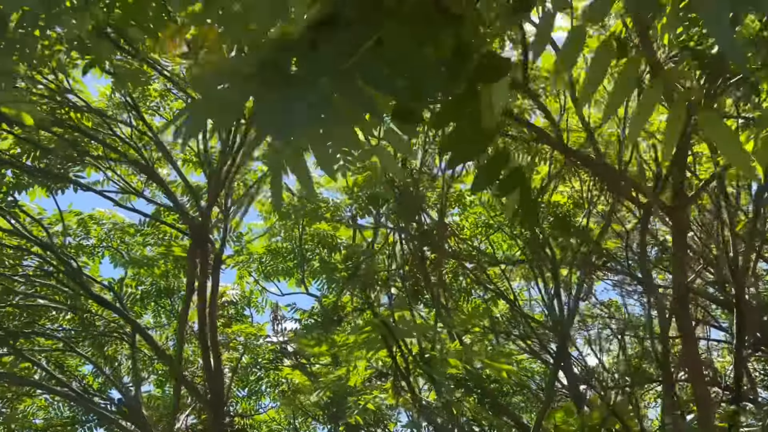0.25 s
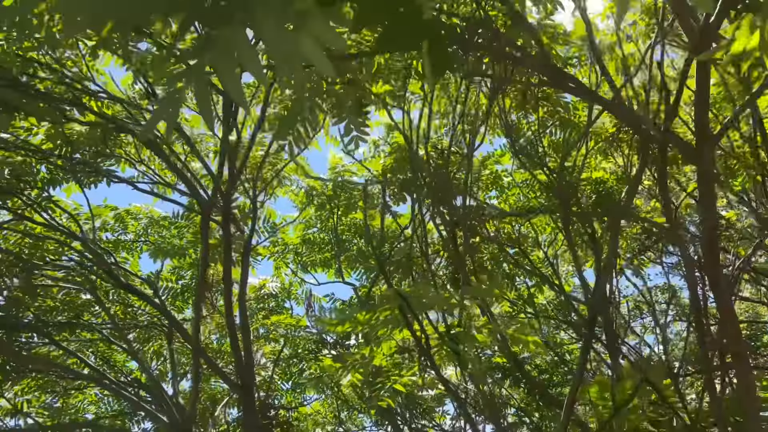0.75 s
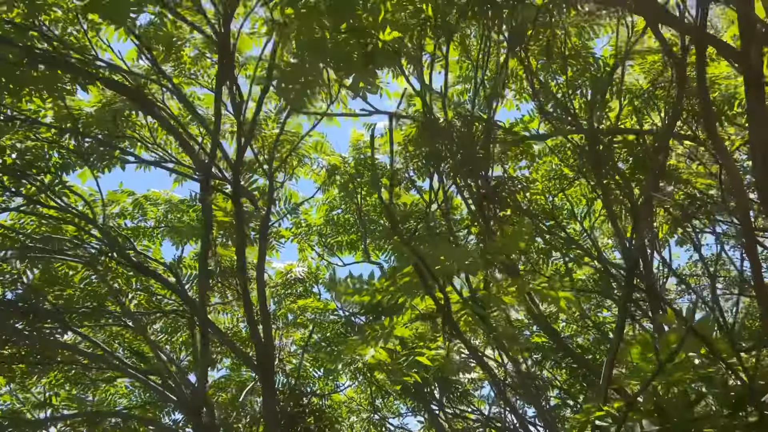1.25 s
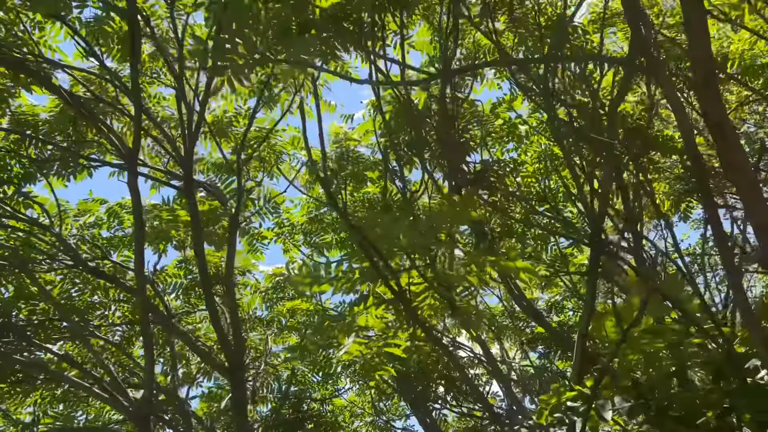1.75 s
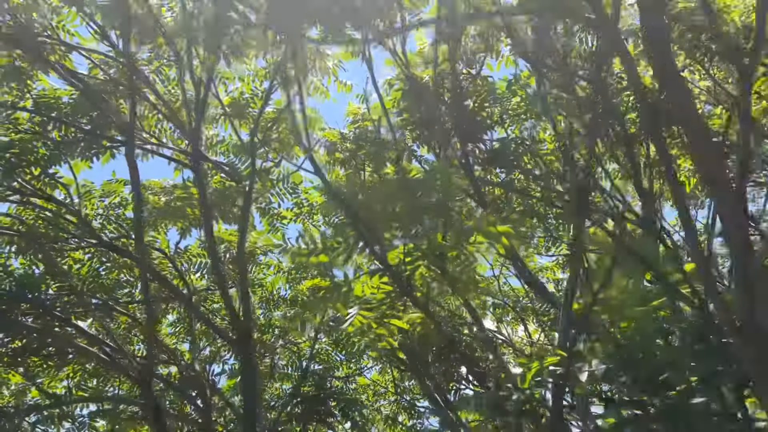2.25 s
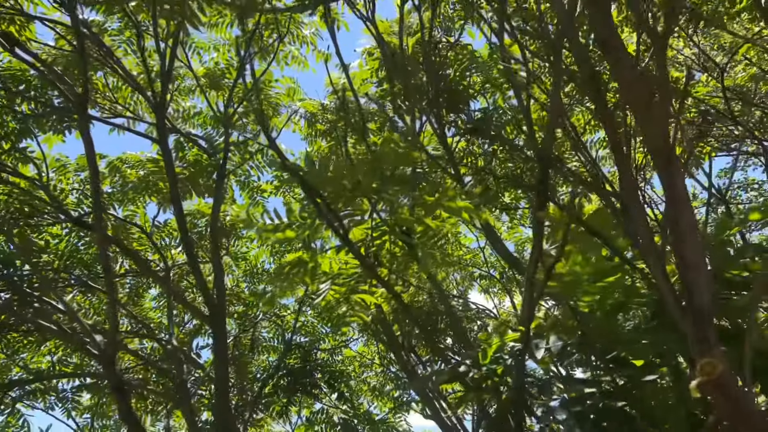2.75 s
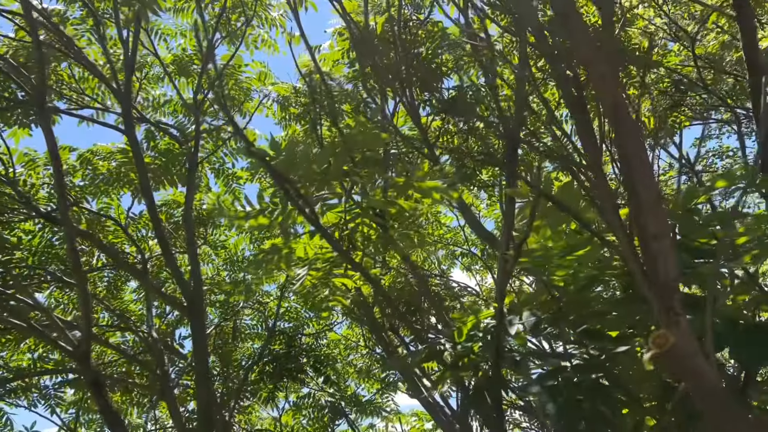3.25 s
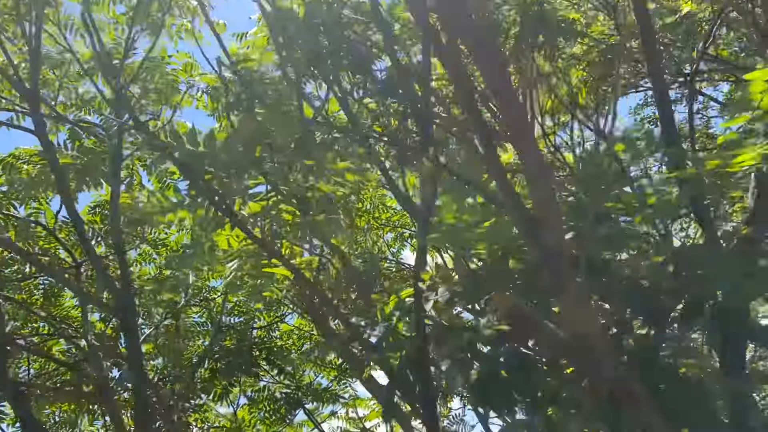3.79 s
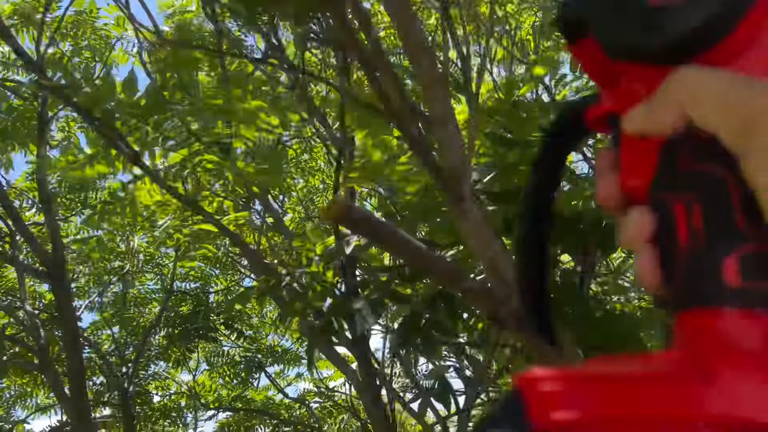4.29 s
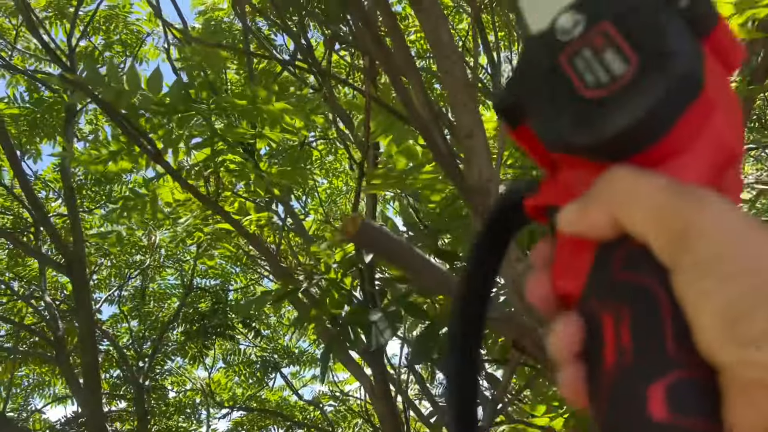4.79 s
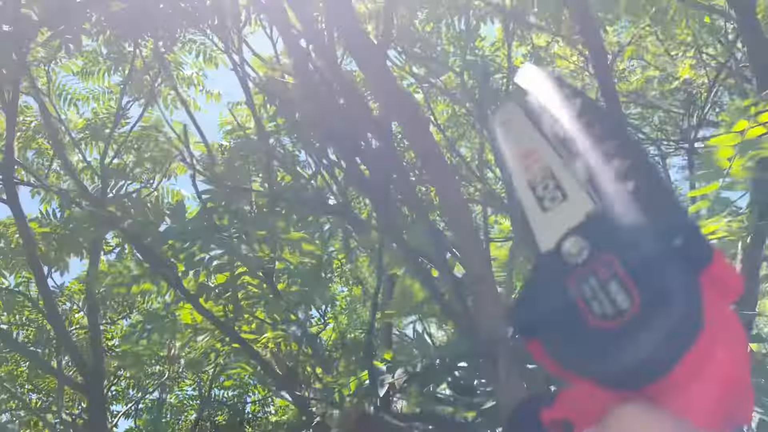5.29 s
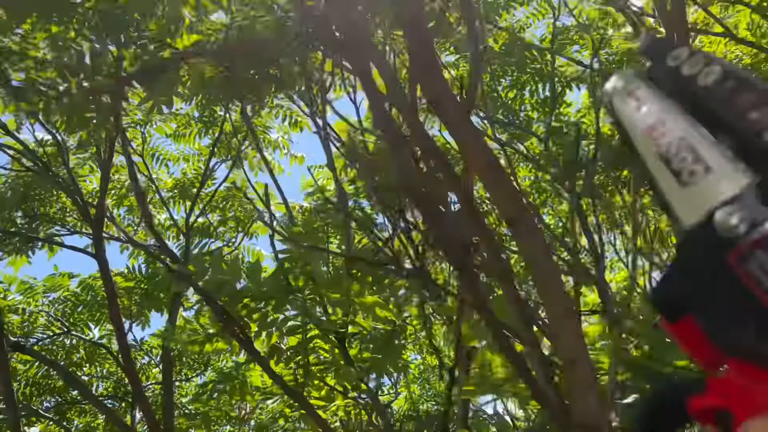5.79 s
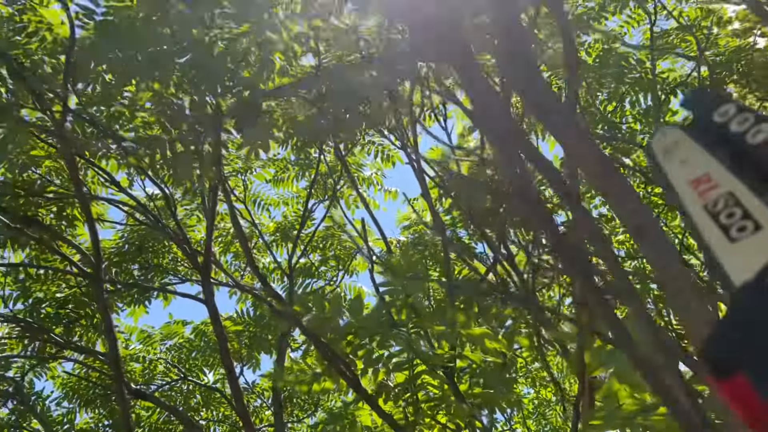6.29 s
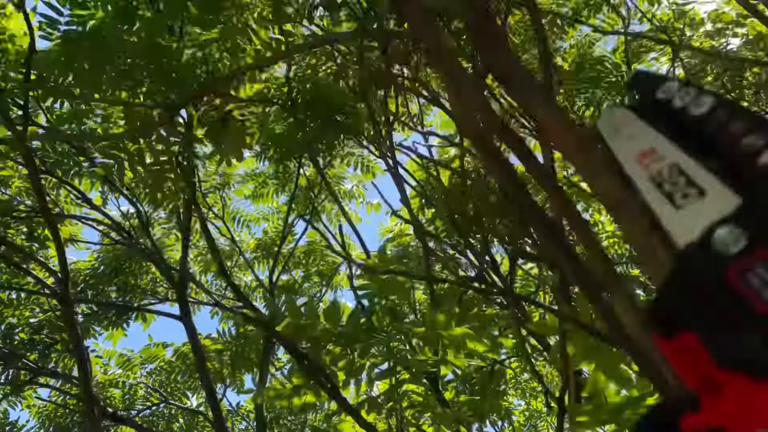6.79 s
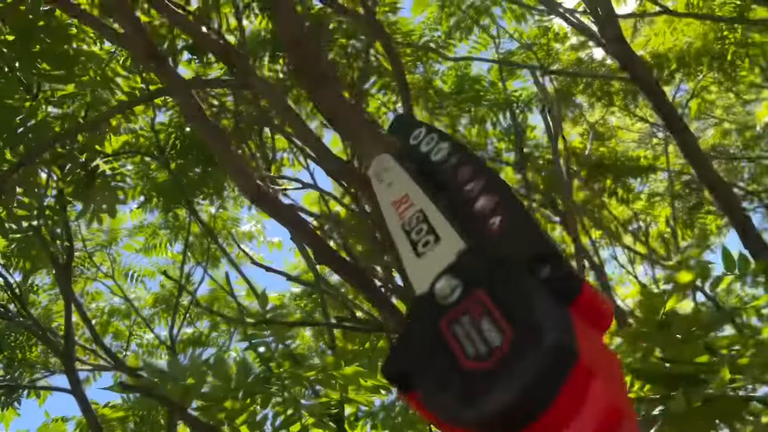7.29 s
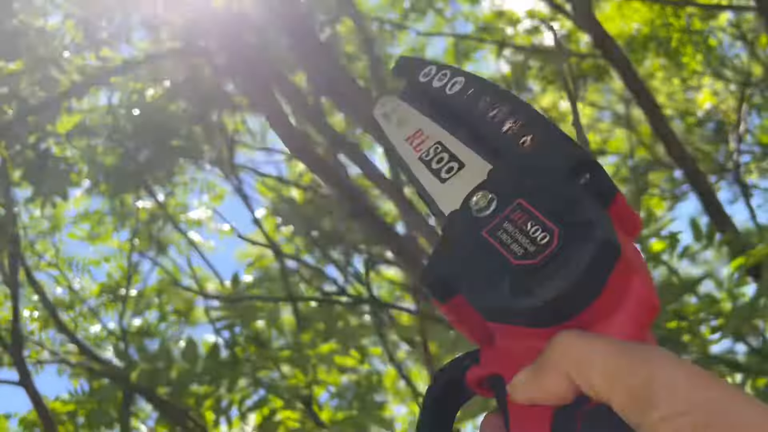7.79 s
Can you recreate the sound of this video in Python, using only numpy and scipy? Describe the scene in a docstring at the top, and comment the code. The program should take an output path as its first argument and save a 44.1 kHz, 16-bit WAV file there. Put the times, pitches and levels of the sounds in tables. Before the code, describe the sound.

Under trees outdoors, a low uneven engine idle and bassy air lie beneath near chirps on the left and fast insect trills. Leaves rustle faintly and small parts click. After a sharper click a little battery chainsaw jumps to full speed, close to a stereo microphone, and runs unloaded with a rattling, hissing whine. Its brightness shifts as it is swung around, while the background sinks away almost completely.

```python
"""An engine idles in airy ambience while insects chirp and trill, leaves rustle and small parts click.
Then a small battery chainsaw starts under trees and runs unloaded, swung past a pair of microphones,
while the background sinks. Engine and whine are sums of sines locked to turning rates, insects are
gated tones, air and leaves are filtered noise, and the saw adds link knocks and throbbing noise bands."""
import sys
import numpy as np
from scipy import signal
from scipy.fft import rfft, irfft, next_fast_len
from scipy.io import wavfile
from scipy.ndimage import map_coordinates

SR = 44100
rng = np.random.default_rng(int(sys.argv[2]) if len(sys.argv) > 2 else 0)


def wav_out(sig):
    """Save sig, one row per channel (or a flat mono array), as 16-bit PCM at SR to the path in sys.argv[1]."""
    wavfile.write(sys.argv[1], SR, np.round(np.clip(np.atleast_2d(sig).T, -1, 1) * 32767).astype(np.int16))


N = 354651
TIME = np.arange(N) / SR
HZ = np.fft.rfftfreq(next_fast_len(N), 1 / SR) + 1e-3  # kept off zero for logs and divisions

# fader of the whole background: (time [s], level [dB])
BACKGROUND_FADER = [(0, -0.5), (2.35, 2), (2.41, -4), (2.5, -11.5), (2.8, -10), (3.5, -18.5), (5, -23),
                    (8.04, -24.5)]

# idling engine: levels of orders 9 to 18 of the cycle [dB]
IDLE_ORDER_DB = [-49, -65, -38.5, -34, -34.5, -45.5, -62, -34.5, -48, -43]
CYCLE_HZ, FIRING_S = 4.797, 0.205  # cycle rate, moment of the strongest firing
# low hum beside the idle, changing in level: (time [s], level [dB])
HUM_LEVEL = [(0, -51), (.7, -53), (1.0, -40.5), (2.4, -46), (8.04, -37.5)]
HUM_HZ = 109.3

# colour of the air: (frequency [Hz], relative level [dB])
AIR_COLOUR = [(33, -42), (48, -9.5), (75, -12), (130, -29), (300, -37.5), (1000, -47), (2800, -57.5),
              (7000, -62), (10000, -71), (12500, -61.5), (15500, -45)]
# left-right likeness of the air: (frequency [Hz], likeness [0-1])
AIR_LIKENESS = [(60, 0.98), (130, 0.81), (290, 0.46), (640, 0)]
AIR_DB = -35

# near insect, bursts of even chirps: (first chirp [s], last chirp [s], level [dB])
NEAR_CHIRPS = [(0.014, 0.013, -38.5), (.1735, .2394, -44.5), (.5262, .5934, -43.5), (.7527, .8215, -49),
               (.9872, 1.057, -43.5), (1.231, 1.3002, -47), (1.6237, 1.656, -48), (1.8068, 1.8427, -47),
               (2.105, 2.165, -50), (2.301, 2.335, -52)]
CHIRP_GAP_S, CHIRP_S, NEAR_SAG_HZ = 0.033, 0.018, 800  # usual gap, length, pitch sag at the end
# far insects, trilled phrases: (start [s], end [s], level before the fade [dB])
FAR_PHRASES = [(0.056, 0.328, -47.5), (0.372, 0.658, -46.5), (0.672, 0.935, -48.5), (0.948, 1.155, -46),
               (1.202, 1.44, -45), (1.531, 1.77, -48), (1.77, 2.064, -48.5), (2.07, 2.245, -45.5),
               (2.285, 2.5, -44)]
STROKES_PER_S, FAR_SAG_HZ = 89, 450
PHRASE_RISE_S, PHRASE_FADE_DB = 0.039, -8.5  # ramp at both ends, fade over the phrase

# rustling leaves: (time [s], length [s], level [dB], centre [Hz])
LEAF_RUSTLES = [(0.161, 0.057, -51, 1100), (0.34, 0.032, -54, 1500), (0.462, 0.068, -55, 1290),
                (0.838, .04, -56, 1092), (1.029, 0.16, -52, 1440), (1.815, 0.33, -52, 6760)]

# clicks of twigs, safety catch and trigger: (time [s], level [dB], ring [Hz], ring length [ms],
# crack against the ring [dB], crack centre [Hz], left over right [dB])
CLICKS = [(1.197, -32.5, 855, 1.1, -9, 2400, 2), (1.78, -31, 2100, 5.8, -2, 6380, 6),
          (2.3588, -27, 2200, 3.9, -3, 4000, -5)]

# bearing of the saw: (time [s], lag of the left side [ms])
SAW_BEARING = [(2.42, .398), (3.2, .396), (3.4, .351), (3.6, .283), (3.8, .21), (3.94, .14), (4.03, .045),
               (4.7, .008), (5.4, .012), (5.85, .045), (6.1, .1), (6.25, .125), (6.45, .135), (6.6, .1),
               (7.1, .01), (7.4, -.04), (7.65, -.04), (7.95, -.007)]
# saw swung nearer and farther: (time [s], level [dB])
SAW_NEARNESS = [(2.4, -0.3), (3.0, -2), (3.3, 1), (3.7, 1.1), (4.0, -.5), (4.25, 0), (4.6, -0.5),
                (5.1, 1.06), (5.9, -1), (6.5, 1.3), (7.0, 0.15), (7.9, 1)]
# chain takes up its slack, then bites the sprocket: (time [s], gain [0-1])
START_GAIN = [(2.359, 0), (2.363, .22), (2.373, .35), (2.376, 1)]
START_S, SURGE_S = 2.36, 0.21  # start of the saw, time constant of the starting surge
# spin-up, then settling: (shortfall at the start [links/s], time constant [s])
SPEED_SHORTFALLS = [(86, .07), (5.5, 1.8)]
FULL_SPEED = 449.2  # drive links per s
# slackened trigger: moment, speed lost per s [links/s], level dip, recovery time constant of the dip
SLACK_S, SLACK_SAG, SLACK_DB, SLACK_RECOVER_S = 7.925, 70, -5.5, 0.053
# housing turns away from the microphones: start and end [s]
HOUSING_TURN = (3.22, 3.32)
# left lag at which the saw counts as three quarters side-on, for colour and for balance
SIDE_ON_MS, PAN_MS = 0.068, 0.049

# colours of the five parts of the saw: (frequency [Hz], relative level [dB])
GEARBOX_COLOUR = [(250, -19), (340, -21.5), (430, -5), (660, -3.5), (780, 2), (960, -7), (1150, -2.5),
                  (1370, 2.5), (1600, -6.5), (1800, -13.5), (2400, -25)]
BAR_COLOUR = [(1300, -48), (1650, -5), (1950, 1.5), (2250, -1), (2600, -0.5), (3000, -6.5), (3800, -14)]
LINKS_COLOUR = [(2400, -28), (3000, -5), (3500, 0), (4100, -1), (5200, -1.5), (5800, -22), (7000, -59)]
RAIL_COLOUR = [(4600, -33), (5500, -3.5), (6400, 1), (7000, -1), (7800, 1.5), (9000, 1.5), (10500, -10.5)]
FAN_COLOUR = [(7800, -18.5), (9200, -2), (10200, -8), (11500, 7), (13500, 0), (15500, 8), (17000, -4)]
# per part, in the order above: (level straight ahead [dB], added side-on [dB],
# added while the housing faces the microphones [dB], starting surge [dB])
PART_LEVELS = [(-30, 0.5, -1, 2), (-29, 0.5, 2.5, 4.5), (-33.5, 1, 5.5, 6.5), (-31.5, 5, -0.5, 4.5),
               (-23.5, 0, 0, -8)]
# per part: (left over right following the bearing [dB], the same added whenever off centre [dB])
PART_LEANS = [(-1.5, -1.5), (-3, 1), (-2, 2), (0.5, 5), (3, 0)]
# per part, throb depth: (link [0-1], sprocket turn [0-1], motor turn [0-1], uneven links of the lap [0-1])
PART_THROB = [(.08, .07, .11, .1), (.18, .25, .15, .17), (.07, .02, .03, .07), (.07, .042, .04, .09),
              (.09, .06, .04, .06)]
# per part, power shares: (repeating knocks [0-1], scattered by leaves straight ahead [0-1], side-on [0-1])
PART_TEXTURE = [(0.39, 0.02, 0.092), (0.37, 0.023, 0.045), (0.12, 0.015, 0.47), (0.022, 0.96, 1),
                (0.018, .01, .01)]
SCREENED = 0.24  # share of the side-on change in scattering that the facing housing screens off

# clean whine: multiples of the link rate; sevenths are sprocket turns, fifths add the motor turn
WHINE_MULTIPLES = [1, 9 / 7, 2, 15 / 7, 20 / 7, 3, 3.2, 4.2, 5, 5.2]
# whine orders under 5: level before wander [dB]
WHINE_LEVELS = [-42, -53, -51.5, -54, -47, -33.5, -42.5, -46]
# orders 5 and 5.2: (level turned away [dB], added while facing [dB], starting surge [dB])
FIFTH_LEVELS = [(-40.5, 8.5, 10.5), (-54, 14, 8)]
WHINE_WANDER_DB, WHINE_WANDER = 1.5, 0.3  # wander in level, in phase [radians]
SPIN_UP_WANDER, SPIN_UP_WANDER_S = 2.0, 0.15  # extra phase wander [radians], its time constant

# hollow of the housing: (centre [Hz], width [Hz])
HOLLOW_BAND = (2130, 110)
# its level: (turned away [dB], added while facing [dB], starting surge [dB])
HOLLOW_LEVEL = (-45, 14, 3.5)
# singing rail: (centre [Hz], width [Hz])
RAIL_WHISTLE = (6450, 550)
RAIL_WHISTLE_DB = -36
# gliding bright band: (time [s], centre [Hz], level [dB], left over right [dB])
BRIGHT_SWEEP = [(3.05, 8600, -33, -9), (3.2, 8000, -27, -3), (3.35, 6200, -28, 2), (3.5, 5350, -22.5, 7.5),
                (3.75, 5620, -30.5, -2), (3.95, 5700, -35, 0), (4.05, 5800, -50, 0)]
SWEEP_WIDTH_HZ = 3200

# colour change while the housing faces the microphones: (frequency [Hz], level [dB])
FACING_TINT = [(400, 0), (900, 4), (1100, 4.5), (1350, -1), (1650, 0.5), (3600, -0.5), (4050, -7.5),
               (4500, 0), (9700, 2.5), (14000, -4)]
# colour change at a slant, reversed on the other side: (frequency [Hz], level [dB])
SLANT_TINT = [(1400, 0.5), (1900, 4.5), (2600, -2), (3300, -3.5), (4300, -0.5), (6300, 1)]
SLANT_MS = 0.16  # left lag where the slant colour is strongest
# left lag added below and above the pitch that parts them
LOWER_LAG_MS, UPPER_LAG_MS, PARTING_HZ = 0.018, -0.02, 2500
BASS_SHADE_DB_PER_MS = -10  # bass lost on the left per ms of lag

# treble crossover, lag of the left treble, frequency where both sides are in step, top edge
TREBLE_HZ, TREBLE_LAG_MS, IN_STEP_HZ, CUTOFF_HZ = 7750, 0.25, 12166, 15800


def amp(db):
    """Turns decibels into gain."""
    return 10 ** (np.asarray(db) / 20)


def rms_one(x):
    """Scales the whole array to rms 1."""
    return x / np.sqrt(np.mean(x ** 2) + 1e-20)


def in_time(rows):
    """Draws straight lines through every column of a time table."""
    times, *columns = np.transpose(rows)
    return np.array([np.interp(TIME, times, column) for column in columns])


def at_hz(points):
    """Reads a frequency table along a log frequency axis."""
    hz, values = np.transpose(points)
    return np.interp(np.log(HZ), np.log(hz), values)


def shaped(x, gain):
    """Weights every frequency by gain."""
    size = next_fast_len(N)
    return irfft(rfft(x, size) * gain, size)[..., :N]


def drift(rate_hz):
    """Slow random wander of rms 1."""
    return rms_one(shaped(rng.standard_normal(N), 1 / (1 + (HZ / rate_hz) ** 2)))


def pan(db):
    """Left and right gains, the left louder by db."""
    return amp(np.array([db / 2, -db / 2]))


def later(x, lag_ms):
    """Delays by a lag that may glide."""
    return map_coordinates(x, [np.arange(N) - lag_ms * SR / 1000], order=3)


def resonance(x, hz, width_hz):
    """Two-pole ringing band."""
    radius = np.exp(-np.pi * width_hz / SR)
    poles = [1, -2 * radius * np.cos(2 * np.pi * hz / SR), radius ** 2]
    return signal.lfilter([1, 0, -1], poles, x + 1e-18)


def narrow_noise(band):
    """Noise rung twice through one resonance, at rms 1."""
    return rms_one(resonance(resonance(rng.standard_normal(N), *band), *band))


def engine():
    """Uneven firings repeat each cycle: orders line up once a cycle and throb; a low hum runs beside."""
    cycle = 2 * np.pi * CYCLE_HZ * (TIME - FIRING_S)
    idle = 0
    for order, db in enumerate(IDLE_ORDER_DB, start=9):
        level = amp(db + 3.5 * drift(1.0))
        idle = idle + level * np.sin(order * cycle + 1.05 * drift(3.3))
    hum_level = amp(in_time(HUM_LEVEL)[0] + 2.9 * drift(1.8))
    hum = hum_level * np.sin(2 * np.pi * HUM_HZ * TIME)
    return np.sqrt(2) * (idle + hum) * pan(1.1)[:, None]


def air():
    """Far traffic and foliage as mid-side noise, alike on both sides only in the bass."""
    alike = np.clip(at_hz(AIR_LIKENESS), 0, 1)
    colour = amp(at_hz(AIR_COLOUR))
    mid, side = rng.standard_normal((2, N))
    mid = shaped(mid, colour * np.sqrt(1 + alike))
    side = shaped(side, colour * np.sqrt(1 - alike))
    return amp(AIR_DB) * rms_one(np.array([mid + side, mid - side]))


def chirp(length_s, off_hz, sag_hz, phase):
    """A few wing strokes that hold their pitch, then sag at the end."""
    age = np.arange(round(length_s * SR)) / SR
    pitch_hz = 5650 + off_hz - sag_hz * (age / length_s) ** 4
    strokes = 0.75 - 0.22 * np.cos(2 * np.pi * 170 * age + phase)
    envelope = np.sin(np.pi * age / length_s) ** 0.61
    return envelope * strokes * np.sin(2 * np.pi * np.cumsum(pitch_hz) / SR)


def near_insect():
    """One insect close by on the left repeats evenly spaced chirps."""
    out = np.zeros((2, N))
    for first, last, db in NEAR_CHIRPS:
        count = round((last - first) / CHIRP_GAP_S) + 1
        for middle in np.linspace(first, last, count):
            detune, phase, loudness = rng.standard_normal(3)
            one = amp(db + loudness) * chirp(CHIRP_S, 20 * detune, NEAR_SAG_HZ, phase)
            at = round(max(middle - CHIRP_S / 2, 0) * SR)
            out[:, at:at + len(one)] += one * pan(9.7)[:, None]
    return out


def far_insects():
    """Rapid strokes swell and fade in phrases, unlike on the two sides, over a soft blurred band."""
    out = np.zeros((2, N))
    for start, end, db in FAR_PHRASES:
        for s in np.arange(start, end, 1 / STROKES_PER_S):
            ramp = min(1, (s - start) / PHRASE_RISE_S, (end - s) / PHRASE_RISE_S)
            swell = ramp * amp(db + PHRASE_FADE_DB * (s - start) / (end - start))
            for side in range(2):
                detune, phase, loudness, timing = rng.standard_normal(4)
                gain = swell * amp(1.5 * loudness) * pan(8.5)[side]
                one = gain * chirp(0.0205, -130 * abs(detune), FAR_SAG_HZ, phase)
                at = round((s + 0.0026 * timing) * SR)
                out[side, at:at + len(one)] += one
    blur = rms_one(resonance(resonance(rng.standard_normal((2, N)), 5600, 600), 5200, 650))
    return out + amp(-63) * blur


def leaves():
    """Swells of dense dry grains: noise with fast level flicker through a broad resonance."""
    out = np.zeros((2, N))
    for s, length_s, db, hz in LEAF_RUSTLES:
        at, size = round(s * SR), round(length_s * SR)
        swell = np.sin(np.linspace(0, np.pi, size)) ** 1.8
        grains = rng.standard_normal((2, size)) * amp(2.6 * drift(133.0)[:size])
        out[:, at:at + size] += amp(db) * swell * rms_one(resonance(grains, hz, 0.35 * hz))
    return out


def ticks():
    """A noise crack, and a sine ring held until the part seats."""
    out = np.zeros((2, N))
    age = np.arange(900) / SR
    for s, db, hz, ms, crack_db, crack_hz, pan_db in CLICKS:
        noise = rng.standard_normal(len(age))
        crack = rms_one(resonance(noise, crack_hz, 0.5 * crack_hz)) * np.exp(-age / 0.003)
        ring = np.exp(-(1000 * age / ms) ** 3) * np.sin(2 * np.pi * hz * age)
        tick = ring + amp(crack_db) * crack
        at = round(s * SR)
        out[:, at:at + len(age)] += amp(db) * tick * pan(pan_db)[:, None]
    return out


def dying(start_s, constant_s):
    """1 until start_s, then an exponential fall."""
    return np.exp(-np.maximum(TIME - start_s, 0) / constant_s)


def chain_speed():
    """Spins up fast, settles slowly, sags when the trigger slackens; in links per s."""
    shortfall = sum(short * dying(START_S, constant_s) for short, constant_s in SPEED_SHORTFALLS)
    return FULL_SPEED - shortfall - SLACK_SAG * np.maximum(TIME - SLACK_S, 0)


def facing():
    """1 while the housing faces the microphones, 0 once turned away."""
    return np.interp(TIME, HOUSING_TURN, [1, 0])


def saw_db(away_db, facing_db, surge_db):
    """Level from the turn of the housing, the starting surge, nearness and the slack trigger."""
    slack = np.clip((TIME - SLACK_S) / 0.025, 0, 1) * dying(SLACK_S + 0.025, SLACK_RECOVER_S)
    level_db = away_db + facing_db * facing() + surge_db * dying(START_S, SURGE_S)
    return level_db + in_time(SAW_NEARNESS)[0] + SLACK_DB * slack


def moving_parts(links, side_on, lean, pans):
    """Gearbox, bar, links, rail and fan: knocks and throbbing noise, heard direct and leaf-scattered."""
    # four contacts per link (tooth, rail, nose, guard), set partly by the tooth, partly by the link
    contact = np.floor(links * 4).astype(int)
    by_tooth = rng.standard_normal(28)[contact % 28]
    by_link = rng.standard_normal(140)[contact % 140]
    knocks = rms_one(np.diff(contact, prepend=0) * (by_tooth / 2 + by_link))
    lap = np.interp(links % 35, np.arange(36), np.resize(rng.standard_normal(35), 36))
    link, sprocket, motor = np.cos(2 * np.pi * links / [[1], [7], [5]])
    colours = [GEARBOX_COLOUR, BAR_COLOUR, LINKS_COLOUR, RAIL_COLOUR, FAN_COLOUR]
    direct, scattered = 0, 0
    for colour, levels, sides, depths, texture in zip(colours, PART_LEVELS, pans, PART_THROB, PART_TEXTURE):
        ahead_db, side_db, facing_db, surge_db = levels
        per_link, per_turn, per_motor, per_lap = depths
        knock, ahead, beside = texture
        throb = np.exp(per_link * link + per_turn * sprocket + per_motor * motor + per_lap * lap)
        # one direct layer, two independent scattered ones
        rattle = rms_one(throb * rng.standard_normal((3, N)))
        rattle[0] = np.sqrt(np.clip(1 - knock, 0, 1)) * rattle[0] + np.sqrt(knock) * knocks
        level_db = saw_db(ahead_db + side_db * np.maximum(side_on, 0), facing_db, surge_db)
        sound = rms_one(shaped(rattle, amp(at_hz(colour)))) * amp(level_db + 1.4 * drift(14.6))
        share = ahead + (beside - ahead) * np.abs(lean) * (1 - SCREENED * facing())
        share = np.clip(share, 0, 1)
        direct = direct + np.sqrt(1 - share) * sound[0] * sides
        scattered = scattered + np.sqrt(share) * sound[1:] * sides
    return direct, scattered


def whine(links, speed, pans):
    """Sines locked to the link count, unsteady in spin-up and clearing as the chain gains speed."""
    clarity = (speed / speed.max()) ** 2.7
    wander = WHINE_WANDER + SPIN_UP_WANDER * dying(START_S, SPIN_UP_WANDER_S)
    levels = WHINE_LEVELS + [saw_db(*row) for row in FIFTH_LEVELS]
    out = np.zeros((2, N))
    for order, db in zip(WHINE_MULTIPLES, levels):
        tone = np.sin(2 * np.pi * order * links + wander * drift(22.0))
        level = np.sqrt(2) * amp(db + WHINE_WANDER_DB * drift(23.0))
        # low orders share the balance of the gearbox, high ones that of the bar
        out += pans[int(order > 4)] * clarity * level * tone
    return out


def hollow():
    """The housing's hollow rings as a narrow noise band, stronger while it faces the microphones."""
    return amp(saw_db(*HOLLOW_LEVEL)) * narrow_noise(HOLLOW_BAND)


def rail_whistle(side_on):
    """The rail sings in a soft noise band when seen from the side with the housing turned away."""
    return amp(RAIL_WHISTLE_DB) * side_on ** 2 * (1 - facing()) * narrow_noise(RAIL_WHISTLE)


def sweep():
    """A bright noise band swells and glides as the saw turns: slow noise on a moving carrier."""
    hz, db, pan_db = in_time(BRIGHT_SWEEP)
    slow = shaped(rng.standard_normal((2, N)), 1 / (1 + (2 * HZ / SWEEP_WIDTH_HZ) ** 4))
    turn = 2 * np.pi * np.cumsum(hz) / SR
    band = rms_one(slow[0] * np.cos(turn) + slow[1] * np.sin(turn))
    return amp(db) * band * pan(pan_db)


def lagged_left(left, lag_ms):
    """The farther side hears later; long waves bend round the body and lag more."""
    bass = shaped(left, 1 / (1 + (HZ / 950) ** 4))
    high = shaped(left, 1 / (1 + (PARTING_HZ / HZ) ** 8))
    middle = left - bass - high
    # middle pitches reach the left a little later, high pitches a little earlier
    late_high = later(high, lag_ms + UPPER_LAG_MS)
    late_middle = later(middle, 0.93 * lag_ms + LOWER_LAG_MS)
    late_bass = later(bass, 1.24 * lag_ms + LOWER_LAG_MS)
    return late_high + late_middle + amp(BASS_SHADE_DB_PER_MS * lag_ms) * late_bass


def saw():
    """A loop of 35 drive links runs over a 7-tooth sprocket; each link knocks its own way every lap."""
    speed = chain_speed()
    links = np.cumsum(speed * (1 + 0.0015 * drift(6.0))) / SR  # links passed so far
    lag_ms = in_time(SAW_BEARING)[0]
    side_on, lean = np.tanh(lag_ms / SIDE_ON_MS), np.tanh(lag_ms / PAN_MS)
    pans = [pan(follow_db * lean + off_db * np.abs(lean)) for follow_db, off_db in PART_LEANS]
    direct, scattered = moving_parts(links, side_on, lean, pans)
    direct = direct + sweep() + whine(links, speed, pans) + pans[1] * hollow()
    left, right = direct + rail_whistle(side_on)
    sound = np.array([lagged_left(left, lag_ms), right]) + scattered
    slant = lag_ms / SLANT_MS
    slant_share = slant * np.exp((1 - slant ** 2) / 2)
    for tint, share in [(FACING_TINT, facing()), (SLANT_TINT, slant_share)]:
        sound = sound + share * shaped(sound, amp(at_hz(tint)) - 1)
    return in_time(START_GAIN)[0] * sound


def scene():
    """Mixes the faded background with the clicks and the saw."""
    background = engine() + air() + near_insect() + far_insects() + leaves()
    return amp(in_time(BACKGROUND_FADER)[0]) * background + ticks() + saw()


def record(dry):
    """Above the crossover both sides share the right treble, the left copy late; peaks round, top is cut."""
    left, right = dry
    treble = 1 / (1 + (TREBLE_HZ / HZ) ** 16)
    lag = np.exp(-2j * np.pi * (HZ - IN_STEP_HZ) * TREBLE_LAG_MS / 1000)
    mixed_left = shaped(left, (1 - treble) ** 0.88) + shaped(right, treble ** 1.2 * lag)
    rounded = np.tanh(np.array([mixed_left, right]))
    top_cut = signal.cheby2(16, 60, CUTOFF_HZ * 1.03, fs=SR, output="sos")
    return signal.sosfilt(top_cut, rounded)


dry = scene()
out = record(dry)
wav_out(out)
```